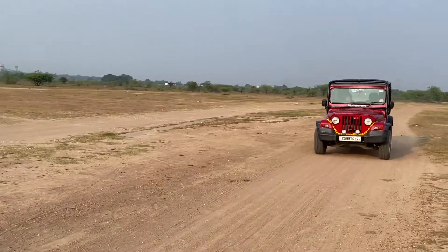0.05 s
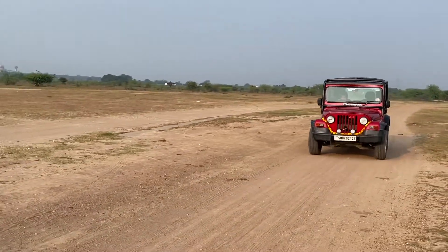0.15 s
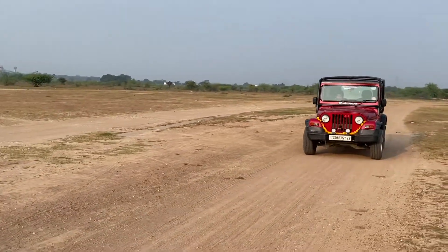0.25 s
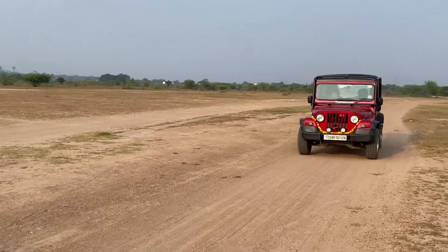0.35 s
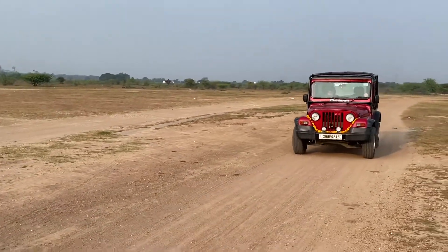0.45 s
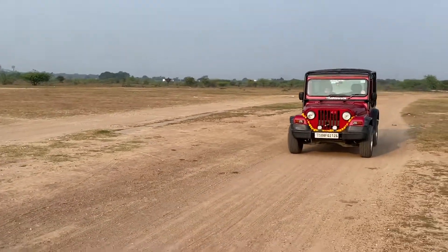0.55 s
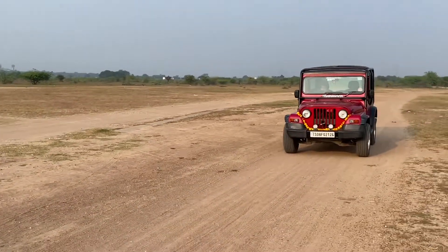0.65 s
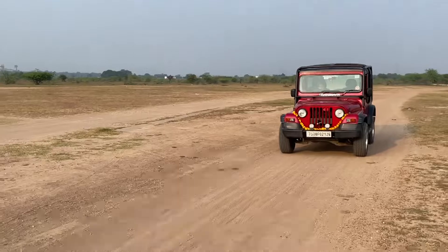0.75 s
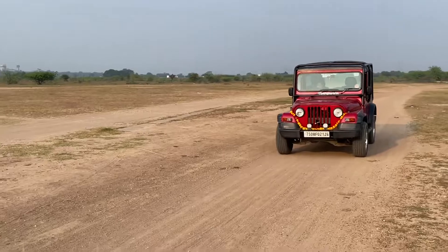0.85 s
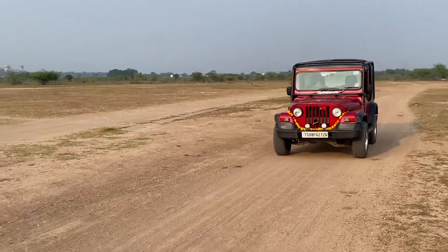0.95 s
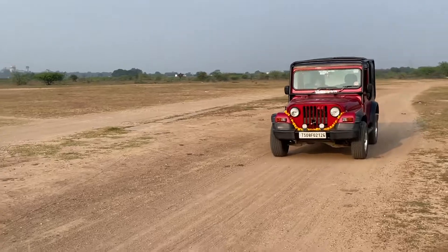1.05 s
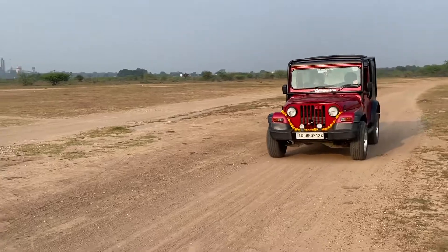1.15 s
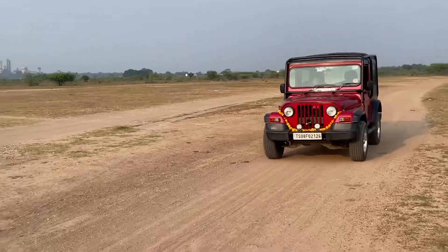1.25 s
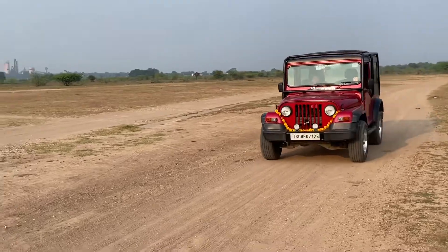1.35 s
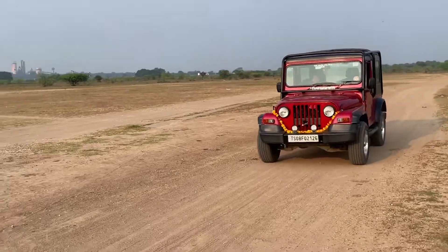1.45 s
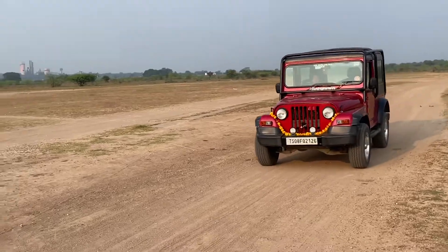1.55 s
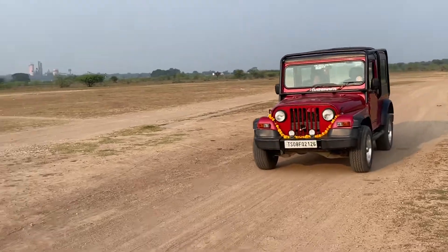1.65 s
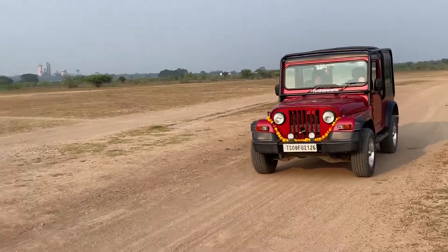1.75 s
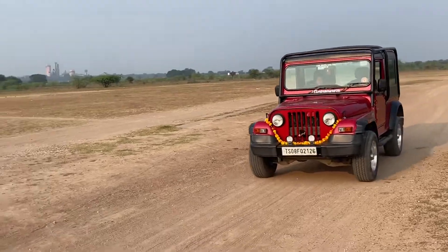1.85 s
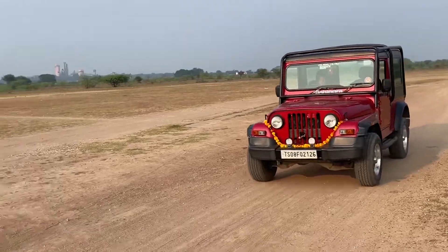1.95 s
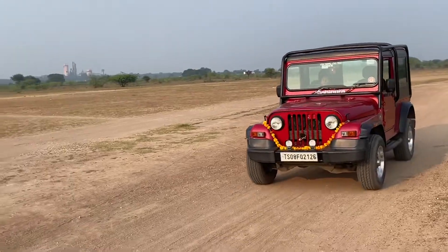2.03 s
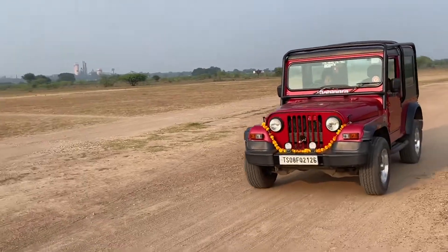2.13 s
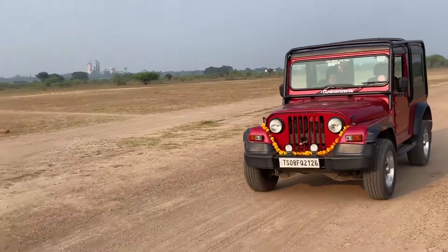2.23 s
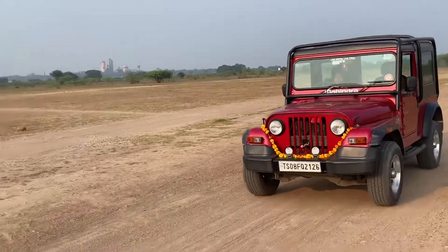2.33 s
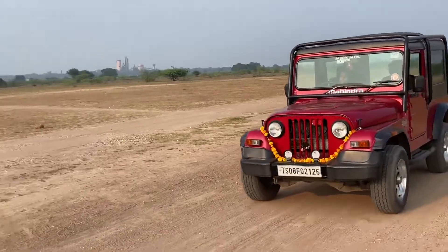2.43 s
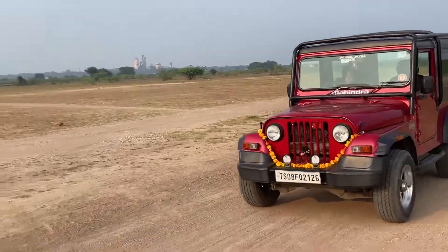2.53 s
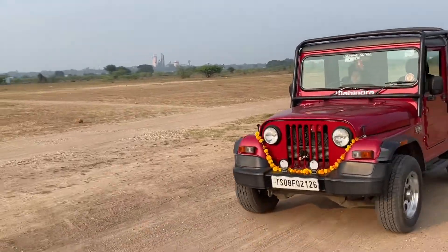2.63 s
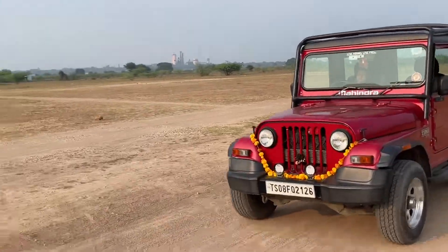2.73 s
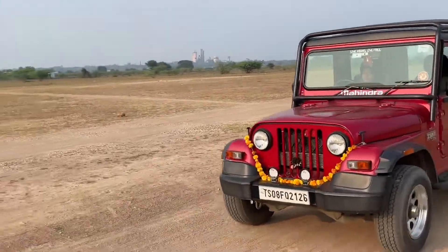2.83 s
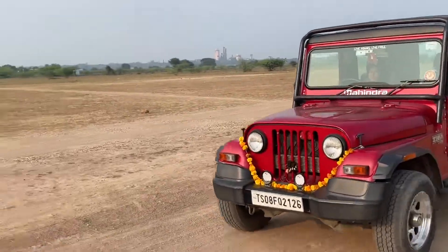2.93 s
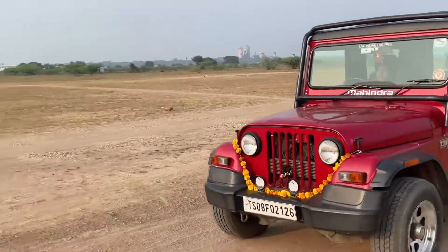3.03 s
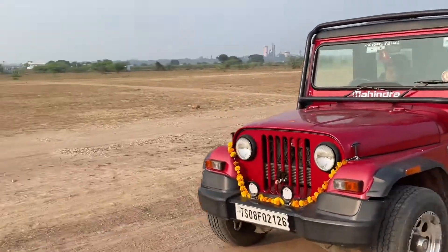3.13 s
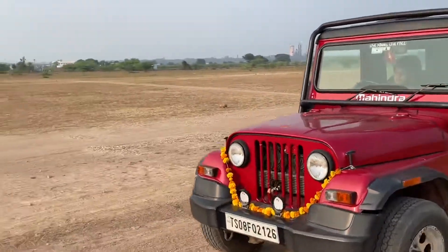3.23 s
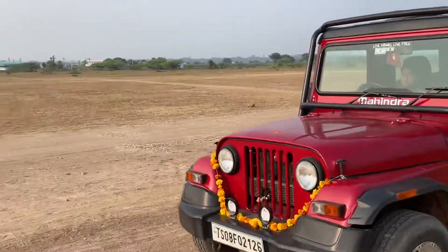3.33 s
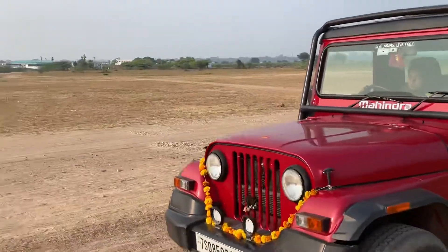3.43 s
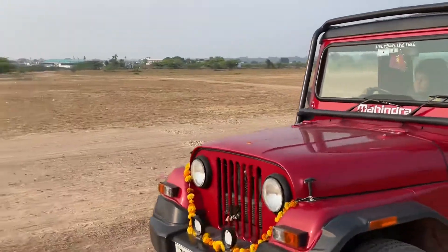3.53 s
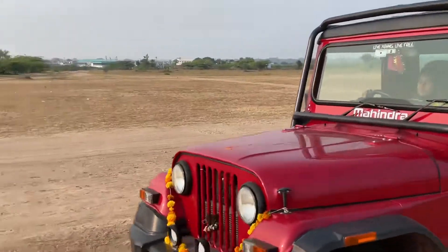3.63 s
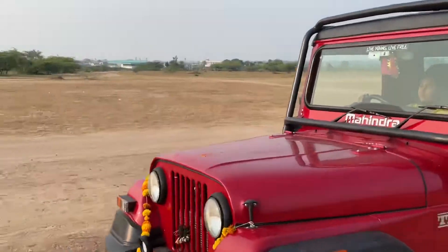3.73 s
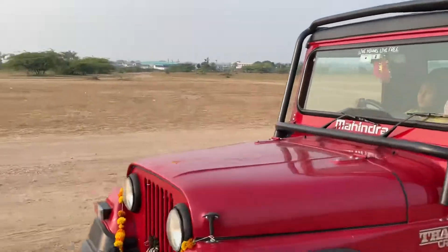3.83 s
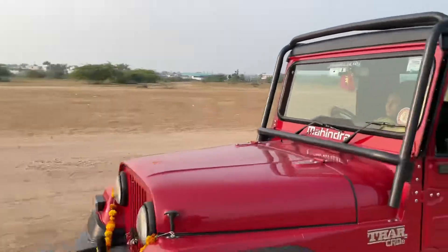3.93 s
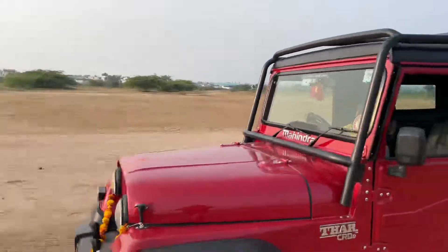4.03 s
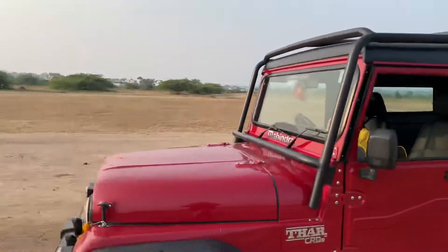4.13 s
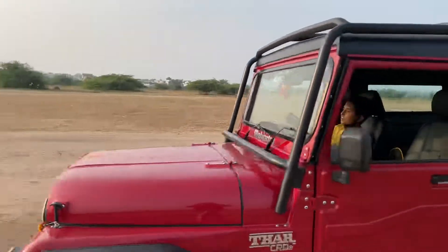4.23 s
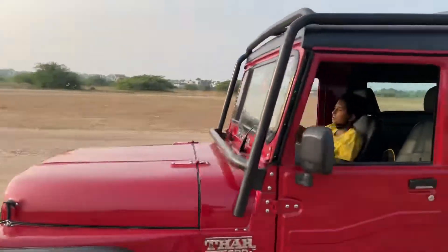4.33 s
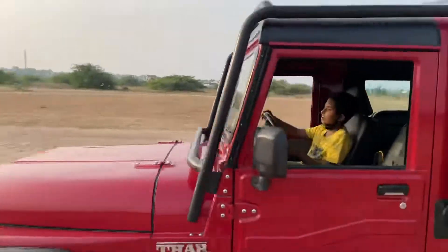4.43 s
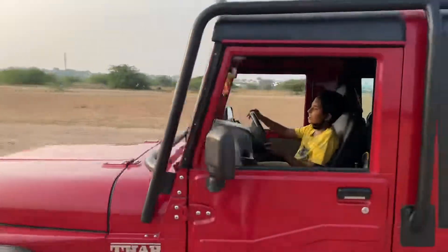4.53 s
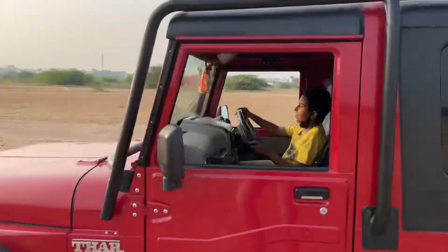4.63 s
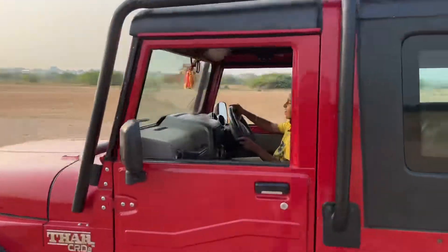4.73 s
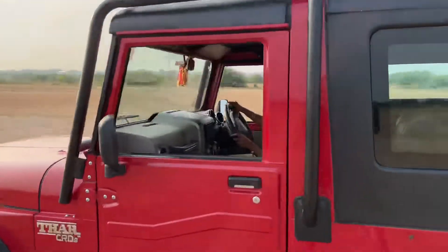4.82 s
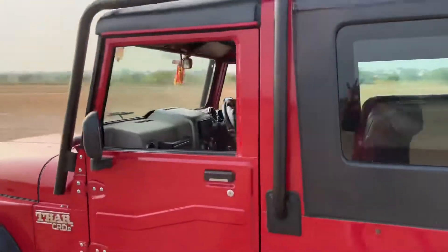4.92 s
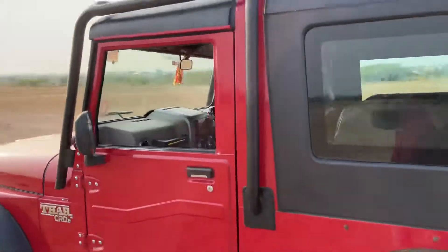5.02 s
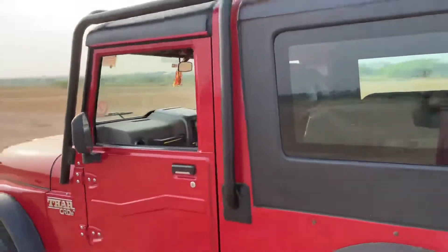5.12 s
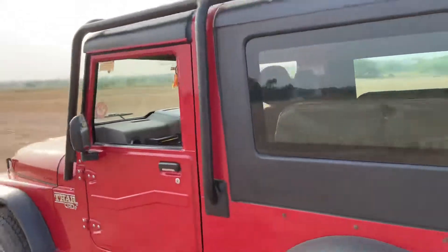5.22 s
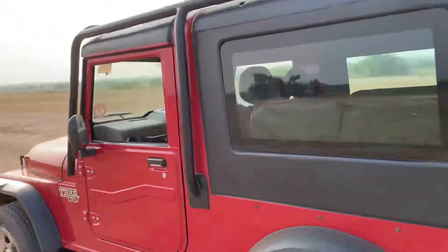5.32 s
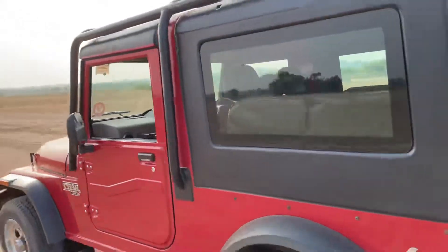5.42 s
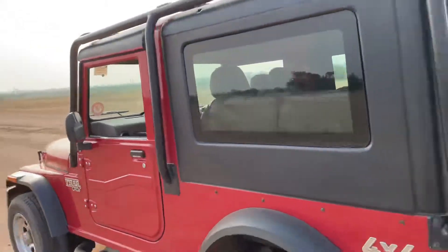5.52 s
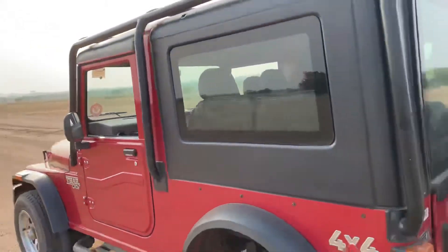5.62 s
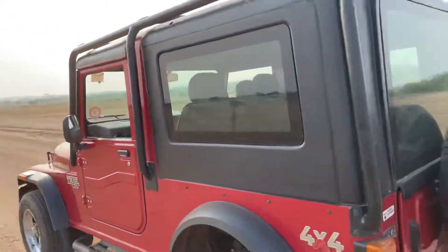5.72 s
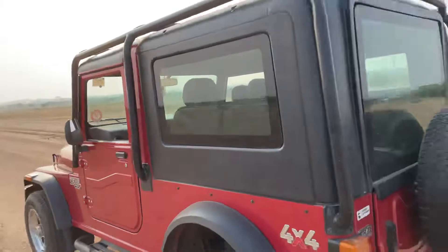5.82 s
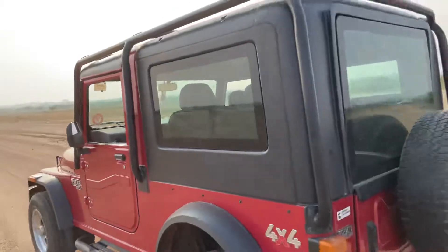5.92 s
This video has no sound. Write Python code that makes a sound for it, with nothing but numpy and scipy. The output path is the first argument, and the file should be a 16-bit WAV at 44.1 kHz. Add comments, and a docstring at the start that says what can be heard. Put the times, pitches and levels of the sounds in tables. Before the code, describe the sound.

Outdoors on open dirt ground, a four-cylinder diesel off-roader drives toward a handheld phone. Rattling knock, low exhaust boom and broad roar swell as the revs rise slightly. It passes close at about four and a half seconds; the knock softens, a thin whine shows, revs fall, and small thuds and clacks follow.

```python
"""Diesel off-roader passing close

A four-cylinder diesel off-roader rolls up a dirt track, passes close, and its engine slows alongside.
Exhaust boom, engine orders and a belt-driven whine are sines locked to the firing phase; knock is struck
resonances; fan, tyre roar and hiss are coloured noise whose balance turns with the side facing the phone.
Clacks, thuds and pops are damped sines; low rumble and wind on the two microphone ports are gusting noise."""
import sys
import numpy as np
from scipy import signal
from scipy.fft import rfft, irfft, next_fast_len
from scipy.io import wavfile
from scipy.ndimage import uniform_filter1d

SR = 44100
rng = np.random.default_rng(int(sys.argv[2]) if len(sys.argv) > 2 else 0)


def boost_factor(decibels):
    """Convert a level in decibels to a linear amplitude factor."""
    exponent = np.asarray(decibels, float) / 20
    return 10 ** exponent


def output_pcm(signal):
    """Save a mono or channel-first signal as 16-bit PCM at the path in sys.argv[1].

    Samples are clipped to [-1, 1] before scaling.
    """
    pcm = np.clip(np.atleast_2d(signal).T, -1, 1) * 32767
    wavfile.write(sys.argv[1], SR, np.round(pcm).astype(np.int16))


N = 263277
T = np.arange(N) / SR  # s

# Engine speed. Each row: time in seconds, firing rate in Hz.
FIRING_RATE = [(0.0, 52.7), (0.28, 53.45), (0.61, 55.3), (1.08, 57.1), (1.6, 59.6), (2.21, 61.1),
               (2.77, 61.9), (3.3, 62.1), (3.82, 61.4), (4.21, 60.4), (4.5, 57.6), (4.97, 55.1),
               (5.49, 50.5), (5.82, 47.1), (5.97, 46.0)]
# Exhaust boom level, with brief dips, at the closest distance.
# Each row: time in seconds, level at the firing rate in dB, level at twice the rate in dB.
BOOM = [(0, -40, -49), (.3, -23, -39), (.7, -20, -28), (1.15, -14.5, -25), (1.5, -20, -24.5),
        (1.62, -19.5, -24), (1.72, -15, -23), (1.86, -15.5, -22), (2.0, -12.5, -20), (2.7, -12.5, -22),
        (3.3, -13.5, -20), (3.58, -14, -19), (3.65, -20, -19), (3.72, -15, -19), (3.82, -15.5, -19),
        (3.9, -24, -19), (3.99, -16, -18.5), (4.2, -16.5, -19), (4.75, -17, -23), (5.0, -22, -18),
        (5.25, -38, -19.5), (5.55, -42, -20), (5.75, -44, -14.5), (5.97, -44, -18)]
# Higher engine lines. Each row: multiple of the firing rate, relative level in dB, loudest time in seconds,
# Gaussian spread in seconds.
ORDERS_HEARD = [(3, 2, 1.2, .6), (3, 4, 2.7, .8), (3, 6, 4.7, .4), (4, 4, .4, .3), (4, 0, 2.5, 1),
                (4.5, 3, .9, .45), (5, 8, 5.33, .17), (6.25, 0, 1.2, .4), (8, -1, 2, .8), (9, 1, 1.5, .6),
                (9, 0, 3.5, .45), (9.5, -1, 3.2, .5), (10, 0, .35, .5), (11, 0, 2.1, .45),
                (11, 0, 2.9, .25), (11, 4, 3.85, .18), (12, 3.5, 1.05, .45), (13, 1, .15, .2),
                (13.5, 2, 2, .6), (16.5, -1, 2, .5), (18, -1, 3.3, .5), (19.25, 0, 3.5, .3),
                (43.1, 8, 5.72, .05)]
# Side lines of the whine. Each row: multiple of the firing rate, level in dB re the main line when fully rough.
WHINE_SIDE_LINES = [(38.55, -1), (37.65, -4), (38.85, -8)]
# Spells of whine. Each row: start in seconds, length in seconds, main line in dB, roughness from 0 to 1.
WHINE_SPELLS = [(.8, .28, -45.5, .1), (1.08, .28, -49, .1), (2.1, 1.1, -47.5, 1), (3.2, .75, -46, 1),
                (3.95, .3, -40, .6), (4.33, .45, -35, .2), (5.14, .19, -34, .1), (5.33, .14, -43, .2),
                (5.47, .3, -35.5, .1)]
# Strength of the four firings on one resonance, loudest first: level in dB.
CYLINDERS_DB = [0, -2.5, -4, -9]
# Lateness of each cylinder's injection, in firing periods.
CYLINDERS_LATE = [0, .012, .07, .03]
# Resonances of the engine block. Each row: centre in Hz, nominal width in Hz, relative level in dB,
# loudest firing (index), side of the next loudest firing (+1 after, -1 before), delay in firing periods.
BLOCK = [(540, 60, -12, 3, -1, .3), (740, 160, -1, 3, -1, .3), (1390, 170, 0, 0, 1, -.1),
         (2200, 260, -7, 1, -1, -.1), (2800, 400, -17, 0, 1, -.1)]
# Colour of the roar by the side facing the phone: far front, nearing, grille close, flank, rear wheel.
# Each row: frequency in Hz, density in dB per Hz.
FAR = [(120, -48), (200, -4), (236, -2), (297, -6), (469, -10), (538, -7), (811, -5.5), (1100, -10),
       (1380, -7.5), (1760, -10.5), (2150, -9.5), (5610, -17.5), (7600, -30), (9880, -139), (16700, -120)]
NEARING = [(120, -40), (200, -42), (306, -9), (546, -7.5), (598, -14.5), (811, -2), (930, -5.5),
           (1400, -9.5), (1790, -8), (2020, -7.5), (2780, -10), (5780, -16.5), (7600, -30.5), (9880, -140),
           (16700, -120)]
GRILLE = [(120, -2), (200, -3.5), (311, -5), (346, -4), (397, -7), (572, -5.5), (686, -4), (752, -3.5),
          (1080, -8.5), (1660, -5.5), (1820, -7.5), (2320, -4.5), (2620, -9), (5120, -10), (7600, -23),
          (9880, -151), (16700, -120)]
FLANK = [(120, -39), (200, -15), (357, -1), (441, -8), (554, -4), (707, -14), (900, -8), (1050, -2),
         (1180, -6), (1300, -7), (1480, -11), (1630, -8), (2700, -12), (3340, -15.5), (4050, -17),
         (4370, -12.5), (4810, -16.5), (5400, -14), (6200, -15.5), (7600, -27), (9880, -124), (16700, -120)]
REAR = [(120, 1), (200, -11), (391, -13), (498, -20), (902, -10.5), (1100, -10.5), (1300, -19), (1630, -19),
        (2180, -19.5), (2390, -14), (3240, -21), (4390, -19.5), (5700, -23), (7600, -38.5), (9880, -73),
        (16700, -120)]
# For those five sides in turn: roar level in dB at the closest distance, before the grille beam.
FACING_DB = [-23, -20.5, -17, -18.5, -18]
# For those five sides in turn: time in seconds at which each faces the phone.
FACING_S = [.8, 2.1, 3.3, 4.5, 5.6]
# Roar echoed off the body side into the right port. Each row: time in seconds, delay in ms, share of the direct.
ECHO = [(3.7, .75, .09), (4.1, .73, .75), (4.85, .75, 1.), (5.1, .92, .8), (5.45, 1.4, .55),
        (5.97, 1.65, .2)]
# Direct roar at the right port. Each row: time in seconds, bass delay in ms, treble delay in ms.
ROAR_LATER = [(3.95, 0, 0), (4.25, .12, .18), (4.55, .18, .45), (4.85, .18, .46), (5.1, .16, .53),
              (5.97, .14, .54)]
# Whine at the right port as the engine bay goes by. Each row: time in seconds, delay in ms.
WHINE_LATER = [(3.8, 0), (4.2, .1), (4.35, .21), (4.9, .21), (5.55, .205), (5.68, .27), (5.97, .28)]
# Treble shaded from the right port by the phone's body. Each row: time in seconds, share taken from 0 to 1.
SHADE = [(3.9, 0.33), (4.3, 0.43), (5.1, 0.15), (5.6, 0.42)]
# Colour of the hiss. Each row: frequency in Hz, density in dB per Hz.
HISS_COLOUR = [(6400, 4), (7000, 5), (7700, -2.5), (9000, 3), (10800, 0.5), (12000, -4.5), (13600, -1),
               (14100, -23)]
# Short clacks, thuds and pops late in the pass, some of them wind on the ports.
# Each row: start in seconds, initial envelope in dB, frequency in Hz, 60 dB decay time in seconds.
CLACKS = [(5.308, -24, 170, 0.04), (5.427, -13, 295, 0.022), (5.498, -6.5, 164, 0.018),
          (5.557, -9, 113, 0.064), (5.605, -14, 108, 0.084), (5.693, -18.5, 760, 0.02),
          (5.704, -14.5, 970, 0.026), (5.713, -17, 810, 0.015), (5.827, -11, 109, 0.044),
          (5.856, -14, 1200, 0.0045), (5.856, -24, 2430, 0.0043)]
# Gusts on the phone. Each row: peak time in seconds, peak strength in dB, decay constant in seconds.
GUSTS = [(.7, -34, 0.47), (1.12, -31.5, 0.068), (1.33, -34, 0.86), (1.99, -26.5, 0.055), (2.08, -30, 0.22),
         (2.5, -28.5, 1), (2.96, -31, 0.14), (3.64, -18, 0.068), (3.86, -17.5, 0.064), (3.955, -13.5, 0.05),
         (4.5, -25, 0.45), (4.68, -27, 0.082), (4.82, -24, 0.15), (4.98, -20.5, 0.044), (5.1, -25, 0.3),
         (5.31, -18, 0.13), (5.58, -21.5, 0.15)]
# Colour of the part alike at both ports. Each row: frequency in Hz, density in dB per Hz.
RUMBLE_COLOUR = [(25, -21), (40, 4), (60, 9), (100, 1.5), (150, -6), (250, -14), (450, -19.5)]
# Colour of the part opposed at the ports. Each row: frequency in Hz, density in dB per Hz.
WIND_COLOUR = [(20, -25), (40, -6), (65, 10), (120, 2), (220, -12), (400, -25), (700, -72)]

SPEED_M_S, PASSES_S, CLOSEST_M = 3.165, 4.547, 1.91
START_CYCLES = .52  # four-firing engine cycles already turned at the start
# the grille lets the engine out forwards; base levels hold at the closest distance with the grille facing
GRILLE_BEAM_DEG, KNOCK_BEAM_DEG = 30, 25
KNOCK_DB, KNOCK_SIDE_DB = -23.5, -20
ORDERS_DB, ORDERS_SIDE_DB = -33.5, -7
ROAR_SIDE_DB = -6
LIGHT_LOAD_DB, LOAD_COMES_S = -4, .7  # the first cylinder's resonances harden under load
# multiples of the firing rate; the belt slips by BELT_SLIP around SLIPS_S
WHINE_MULTIPLE, BELT_SLIP, SLIPS_S, WHINE_FADE_S = 38.2, .4, 4.9, .07
# a narrow dip in the roar slides up and fills in as the vehicle nears
DIP_HZ, DIP_RISE_HZ, DIP_WIDTH_HZ, DIP_DEPTH, DIP_ENDS_S = 1790, 350, 128, .75, 3.85
# the phone swings round to follow the vehicle
SWING_S, SWING_LENGTH_S = 3.6, .19
RIGHT_LATER_MS, RIGHT_LATER_AFTER_S = .205, .25
UNLIKE_AHEAD, UNLIKE_ALONGSIDE, TREBLE_UNLIKE = .19, .6, 1.05  # shares of unrelated sound; treble factor
# roar bands: split delays at TREBLE_HZ, no delay above TOP_HZ
TREBLE_HZ, TOP_HZ, BASS_ECHO_LATER_MS = 2600, 5900, .12
SHADE_HZ, SHADE_WIDTH_HZ = 5960, 2400
LEFT_AHEAD_DB, LEFT_PAST_DB = -1.5, .5  # left over right for the engine's solid sounds
HISS_DB, HISS_LEFT_LATER = -17.5, 8  # dB re the roar; samples
RUMBLE_DB, OPPOSED_DB, GUST_RISE = -30.5, -11.5, .6  # closest distance; re strength; rise over decay time
WAKE_S, WAKE_LENGTH_S, WAKE_DB = 5.24, .56, -26  # the wake of air behind the vehicle
# the deepest rumble fades once the rear wheel is level
DEEP_HZ, DEEP_WIDTH_HZ, DEEP_ENDS_S, DEEP_LOST = 42, 47, 5.1, .63


def curves(table):
    """Linear interpolation in time of each column of a table."""
    s, *columns = np.transpose(table)
    return [np.interp(T, s, column) for column in columns]


def step(s, length):
    """Hyperbolic-tangent transition from 0 to 1 around s."""
    return .5 + .5 * np.tanh((T - s) / length)


def unit(x):
    """Normalisation to rms 1."""
    return x / np.sqrt(np.mean(x ** 2))


def walk(rate):
    """Slow random modulation of rms 1: levels held 1 / rate s, smoothed twice by a moving average."""
    k = int(SR / rate)
    held = np.repeat(rng.standard_normal(N // k + 1), k)
    return unit(uniform_filter1d(uniform_filter1d(held, k), k)[:N])


def noise(points, channels=1):
    """Spectral shaping: white noise weighted by a density over log frequency, then scaled to rms 1."""
    hz, db = np.transpose(points)
    size = next_fast_len(N)
    f = np.arange(1, size // 2 + 2) * SR / size
    gain = boost_factor(np.interp(np.log(f), np.log(hz), db, -90, -90))
    return unit(irfft(rfft(rng.standard_normal((channels, size))) * gain, size)[:, :N])


def ring(x, hz, width):
    """Second-order resonance with gain 1 at its centre."""
    return signal.lfilter(*signal.iirpeak(hz, hz / width, SR), x)


def below(x, hz):
    """Zero-phase low-pass: the filter runs forwards and backwards."""
    return signal.sosfiltfilt(signal.butter(4, hz, fs=SR, output="sos"), x)


def later(x, ms):
    """Time-varying propagation delay by interpolation."""
    return np.interp(np.arange(N) - ms * SR / 1000, np.arange(N), x)


def dip(x, hz, width_hz, depth):
    """Heterodyne notch: shift a moving centre to zero, average, shift back and subtract."""
    turn = np.exp(2j * np.pi * np.cumsum(hz) / SR)
    size = int(SR / width_hz)
    shifted = x / turn
    band = uniform_filter1d(shifted.real, size) + 1j * uniform_filter1d(shifted.imag, size)
    return x - 2 * depth * (band * turn).real


def tone(phase, multiple, waver_db, waver_turns):
    """Harmonic locking: a sine follows the engine phase, wavering in level and phase about rms 1."""
    turns = multiple * phase + waver_turns * walk(6)
    return boost_factor(waver_db * walk(11)) * np.sqrt(2) * np.sin(2 * np.pi * turns)


def boom(phase):
    """Exhaust pulsation: the silencer smooths the pulses to the firing line and its second harmonic."""
    first_db, second_db = curves(BOOM)
    first = boost_factor(first_db) * tone(phase + .37, 1, .7, 0.)
    second = boost_factor(second_db) * tone(phase + .32, 2, .7, 0.)
    return first + second


def knock(phase):
    """Impulsive excitation: each firing rings each block resonance, hardest from the cylinder next to it."""
    scatter_db = rng.standard_normal(N // 400)  # one per firing
    rattle = rng.standard_normal(N)
    out = 0
    for hz, width, db, loudest, way, late in BLOCK:
        periods = phase - late
        count = sum(np.floor((periods - k - lag) / 4) for k, lag in enumerate(CYLINDERS_LATE))
        firing = count.astype(int) + 3
        # the pressure rise repeats from cycle to cycle, the rattle after it does not
        blow = np.diff(firing, prepend=firing[0]) + .05 * np.exp(-(periods % 1) / .1) * rattle
        rank = round(way) * (firing - round(loudest)) % 4
        rung = boost_factor(np.array(CYLINDERS_DB)[rank] + scatter_db[firing]) * blow
        for _ in range(3):
            rung = ring(rung, hz, 1.6 * width)
        light_db = LIGHT_LOAD_DB * (1 - step(LOAD_COMES_S, .35)) * (loudest == 0)
        out = out + boost_factor(db + light_db) * unit(rung)
    return unit(out)


def orders(phase):
    """Engine orders: lines at multiples of the firing rate come and go under Gaussian envelopes."""
    out = 0
    for multiple, db, s, spread in ORDERS_HEARD:
        envelope = np.exp(-.5 * ((T - s) / spread) ** 2)
        out = out + boost_factor(db) * envelope * tone(phase, multiple, 1., .03)
    return out


def whine(phase):
    """Belt-driven alternator: a geared line, joined by side lines and wavering more as it roughens."""
    level = 0
    for s, length, db, _ in WHINE_SPELLS:
        level = level + boost_factor(db) * (step(s, WHINE_FADE_S) - step(s + length, WHINE_FADE_S))
    middles = [s + length / 2 for s, length, *_ in WHINE_SPELLS]
    rough = np.interp(T, middles, [row[-1] for row in WHINE_SPELLS])
    turns = np.cumsum((WHINE_MULTIPLE - BELT_SLIP * step(SLIPS_S, .2)) * np.gradient(phase))
    line = tone(turns, 1, 1. + 3. * rough, .06 + .5 * rough)
    cluster = sum(boost_factor(db) * tone(phase, multiple, 4., .5) for multiple, db in WHINE_SIDE_LINES)
    return level * (line + rough * cluster)


def roar(phase):
    """Broadband flow and tyre noise: fan, intake and tyres pulse with firing; power fades between colours."""
    colours = FAR, NEARING, GRILLE, FLANK, REAR
    shares = [np.interp(T, FACING_S, row) for row in np.eye(5)]
    pulsing = unit(1 + .62 * np.exp(-(phase % 1))) * boost_factor(.21 * walk(16))
    sound = pulsing * sum(np.sqrt(w) * noise(c, channels=2) for w, c in zip(shares, colours))
    # parts of the treble flicker at random on their own
    sound = sound + sum((boost_factor(walk(48)) - 1) * ring(sound, hz, .45 * hz) for hz in (2900, 4300, 6200))
    turned = step(DIP_ENDS_S, .15)
    return dip(sound, DIP_HZ + DIP_RISE_HZ * turned, DIP_WIDTH_HZ, DIP_DEPTH * (1 - turned))


def ports(near, other):
    """Interaural-style delay and decorrelation: the right port adds delay, a moving echo and unlike sound."""
    bass_ms, treble_ms = curves(ROAR_LATER)
    echo_ms, echo = curves(ECHO)
    unlike = swing()[1]
    apart = np.clip(TREBLE_UNLIKE * unlike, 0, 1)
    bass, other_bass = below(near, TREBLE_HZ), below(other, TREBLE_HZ)
    top = near - below(near, TOP_HZ)  # heard by both ports together
    treble = near - bass - top
    scale = np.sqrt(1 + echo ** 2)
    low = (later(bass, bass_ms) + echo * later(bass, echo_ms + BASS_ECHO_LATER_MS)) / scale
    high = (later(treble, treble_ms) + echo * later(treble, echo_ms)) / scale + top
    right_low = np.sqrt(1 - unlike ** 2) * low + unlike * other_bass
    right_high = np.sqrt(1 - apart ** 2) * high + apart * (other - other_bass)
    return np.array([near, right_low + right_high])


def hiss():
    """Modulated high-frequency noise: a top hiss flickers, later at the left port whatever the direction."""
    near, other = boost_factor(.15 * walk(23) + 1.47 * walk(35)) * noise(HISS_COLOUR, channels=2)
    unlike = np.clip(1.04 * swing()[1] - .03, 0, 1)
    left = np.sqrt(1 - unlike ** 2) * np.roll(near, HISS_LEFT_LATER) + unlike * other
    return np.array([left, near])


def shaded(pair):
    """Acoustic shadow: the phone's body takes treble from the right port."""
    left, right = pair
    return np.array([left, right - np.clip(curves(SHADE)[0], 0, 1) * ring(right, SHADE_HZ, SHADE_WIDTH_HZ)])


def clacks():
    """Transient response: short exponentially damped sines for clacks, thuds and pops."""
    out = np.zeros(N)
    for s, db, hz, t60 in CLACKS:
        t = np.maximum(T - s, 0)
        out += boost_factor(db - 60 * t / t60) * np.sin(2 * np.pi * hz * t)
    return out


def distance_m():
    """Straight-line kinematics: a pass at steady speed."""
    return np.hypot(SPEED_M_S * (T - PASSES_S), CLOSEST_M)


def behind_grille(beam_deg):
    """Directivity: near 0 while the grille points at the phone, near 1 once it has turned away."""
    bearing = np.degrees(np.arctan2(CLOSEST_M, SPEED_M_S * (PASSES_S - T)))
    return 1 - np.exp(-(bearing / beam_deg) ** 3)


def swing():
    """Receiver rotation: right-port delay in ms and unlike share as the phone turns."""
    right_ms = RIGHT_LATER_MS * step(SWING_S + RIGHT_LATER_AFTER_S, SWING_LENGTH_S)
    unlike = UNLIKE_AHEAD + (UNLIKE_ALONGSIDE - UNLIKE_AHEAD) * step(SWING_S, SWING_LENGTH_S)
    return right_ms, unlike


def buffeting(near):
    """Pressure fluctuation: low wind and body rumble, one part alike at both ports and one opposed."""
    power = (boost_factor(RUMBLE_DB) * near) ** 2
    for s, db, length in GUSTS:
        envelope = np.exp(np.where(T < s, (T - s) / GUST_RISE, s - T) / length)
        power = power + (boost_factor(db) * envelope) ** 2
    strength = np.sqrt(power)
    wake = boost_factor(WAKE_DB) * np.exp(-.5 * ((T - WAKE_S) / WAKE_LENGTH_S) ** 2)
    alike = strength * boost_factor(2.3 * walk(24.68)) * noise(RUMBLE_COLOUR)[0]
    opposed = np.hypot(boost_factor(OPPOSED_DB) * strength, wake) * boost_factor(4.4 * walk(54)) * noise(WIND_COLOUR)[0]
    wind = np.array([alike + opposed, alike - opposed])
    return wind - DEEP_LOST * step(DEEP_ENDS_S, .11) * ring(wind, DEEP_HZ, DEEP_WIDTH_HZ)


def scene():
    """Superposition: engine and roar follow inverse distance; whine and clacks carry their own levels."""
    near, aside = CLOSEST_M / distance_m(), behind_grille(GRILLE_BEAM_DEG)
    phase = 4 * START_CYCLES + np.cumsum(curves(FIRING_RATE)[0]) / SR  # in firing periods
    engine = boom(phase) + boost_factor(ORDERS_DB + ORDERS_SIDE_DB * aside) * orders(phase)
    engine = engine + boost_factor(KNOCK_DB + KNOCK_SIDE_DB * behind_grille(KNOCK_BEAM_DEG)) * knock(phase)
    solid = near * engine + clacks()
    left_db = LEFT_AHEAD_DB + (LEFT_PAST_DB - LEFT_AHEAD_DB) * np.clip(T / (PASSES_S + 1), 0, 1)
    solid = np.array([solid * boost_factor(left_db / 2), later(solid, swing()[0]) * boost_factor(-left_db / 2)])
    whining = whine(phase)
    whine_pair = np.array([whining, later(whining, curves(WHINE_LATER)[0])])
    rush_level = near * boost_factor(np.interp(T, FACING_S, FACING_DB) + ROAR_SIDE_DB * aside)
    rush = rush_level * shaded(ports(*roar(phase)) + boost_factor(HISS_DB) * hiss())
    return solid + whine_pair + rush + buffeting(near)


def band_limit(x):
    """A steep low-pass at the top of the band."""
    return signal.sosfilt(signal.butter(12, 14360, fs=SR, output="sos"), x)


def record(dry):
    """Port resonance: the left port is livelier around 1.35 kHz."""
    left = dry[0] + .59 * ring(dry[0], 1350, 460)
    mix = np.array([left, dry[1]])
    return band_limit(mix)


dry = scene()
out = record(dry)
output_pcm(out)
```